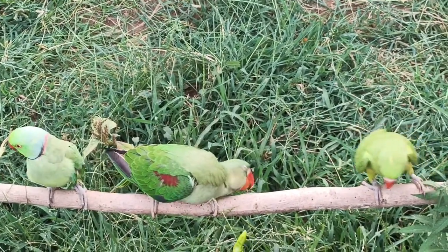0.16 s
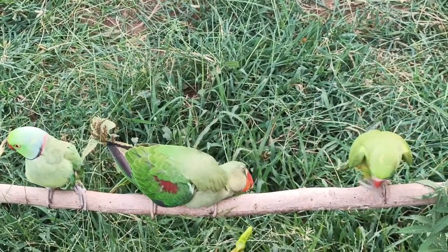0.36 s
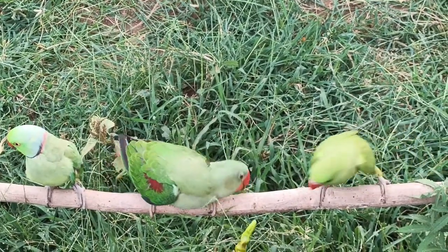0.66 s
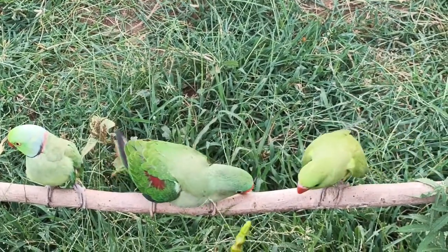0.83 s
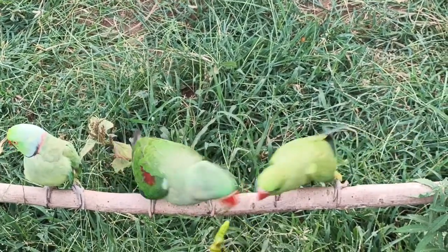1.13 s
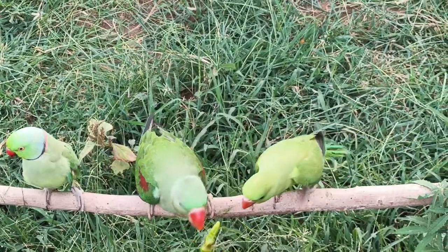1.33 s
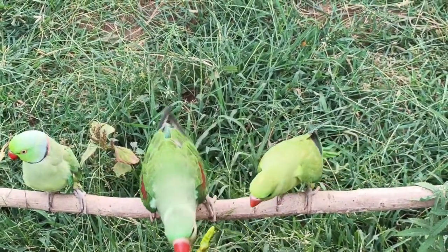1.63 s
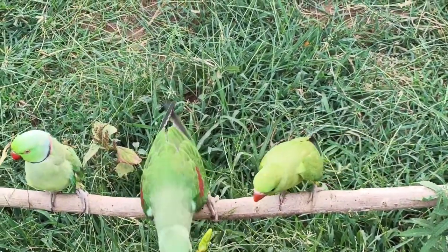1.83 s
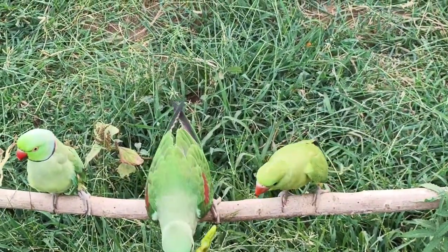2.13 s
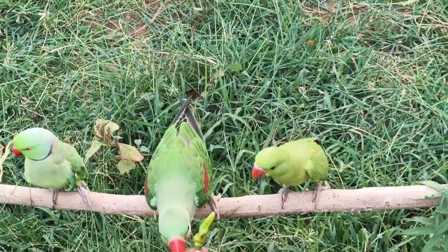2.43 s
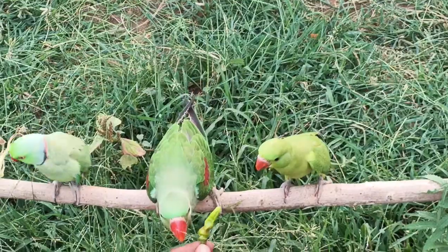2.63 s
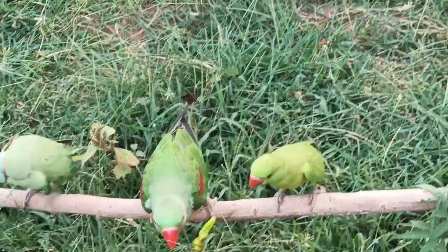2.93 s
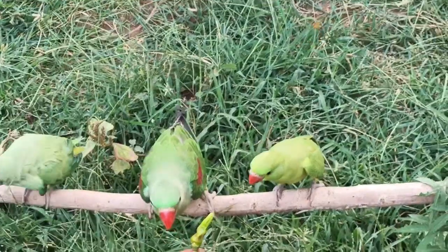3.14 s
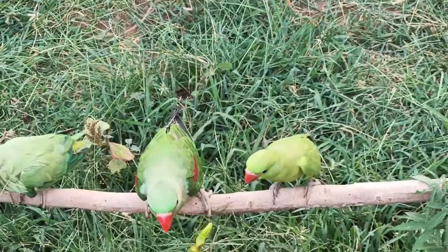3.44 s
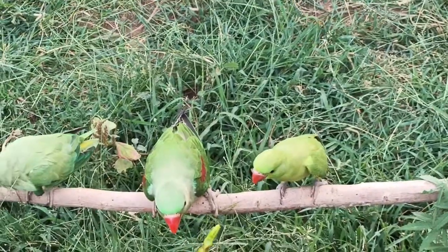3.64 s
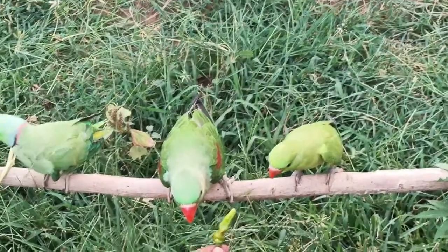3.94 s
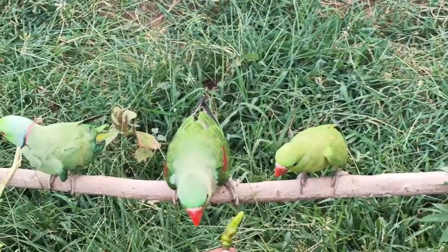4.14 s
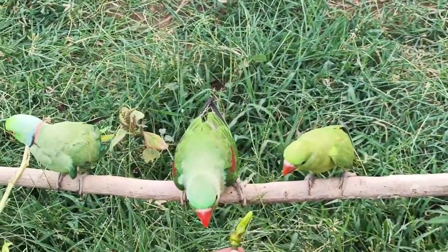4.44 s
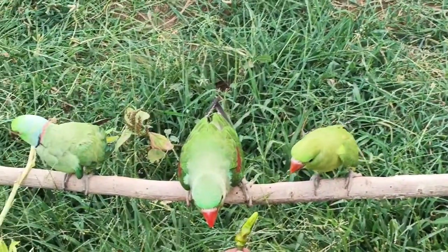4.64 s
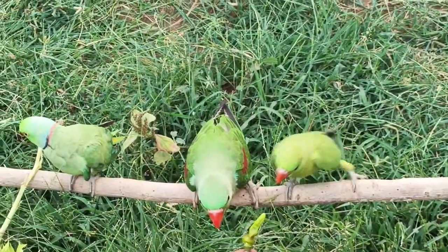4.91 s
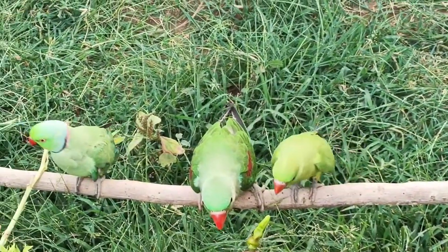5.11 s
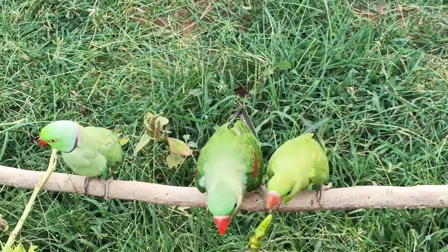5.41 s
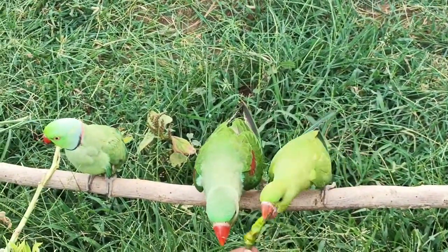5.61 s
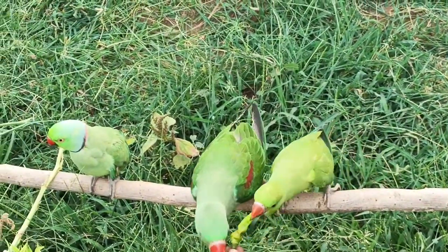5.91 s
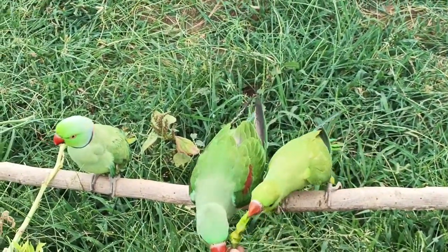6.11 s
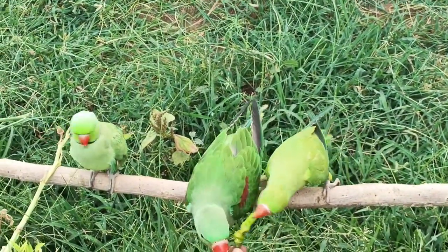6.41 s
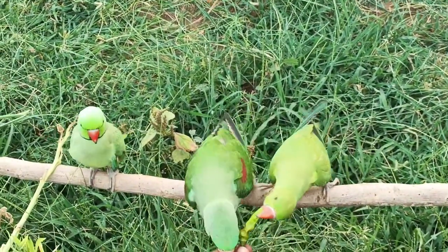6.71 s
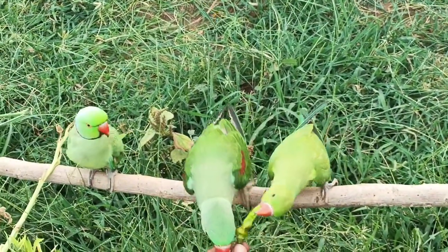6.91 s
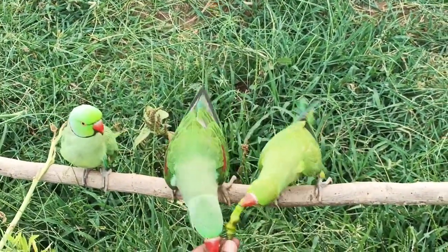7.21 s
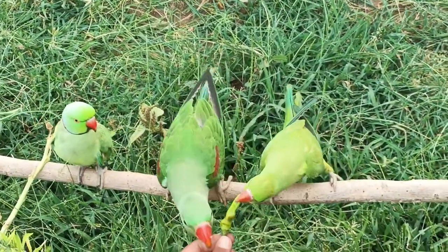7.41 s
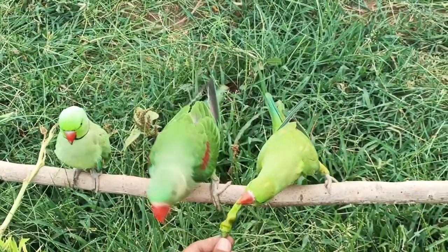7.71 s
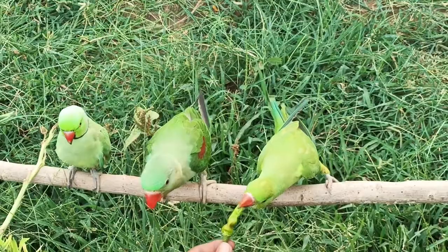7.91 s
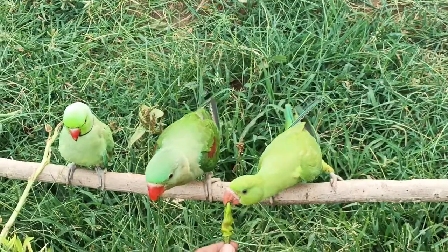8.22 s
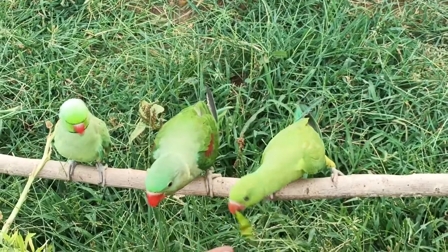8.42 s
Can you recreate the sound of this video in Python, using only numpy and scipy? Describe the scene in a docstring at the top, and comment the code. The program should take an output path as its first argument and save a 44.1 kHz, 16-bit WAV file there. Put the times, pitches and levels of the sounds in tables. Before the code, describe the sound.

Near parakeets on a branch screech in two separate pairs, each cry cracking rapidly between two registers before settling into a raspy, falling end. A short swish precedes the first pair; tiny cracks, hollow ticks and a soft knock follow the second. Crickets shimmer steadily and very high, with distant whistles and a faint low rumble in an open meadow with little echo.

```python
"""Screeching parakeets over grass

Four shrill screeches, stacks of tones whose trembling throat yodels between two registers.
Shaped noise gives a short swish, beak cracks and faint thumps; damped rings give two hollow ticks
and a dull knock. Behind: crickets in rough paired strokes at 7-8 kHz, far birds in gliding notes,
a noise floor and a low outdoor rumble that comes and goes."""
import sys
import numpy as np
from scipy import signal
from scipy.fft import rfft, irfft, next_fast_len
from scipy.io import wavfile
from scipy.ndimage import uniform_filter1d, map_coordinates

SR = 44100
rng = np.random.default_rng(int(sys.argv[2]) if len(sys.argv) > 2 else 0)


def store_wav(level_fs):
    """Save 16-bit WAV to argv[1]."""
    pcm = np.round(np.clip(np.atleast_2d(level_fs), -1, 1) * 32767)
    wavfile.write(sys.argv[1], SR, pcm.T.astype(np.int16))


N = 377055
T = np.arange(N) / SR

# spectrum of the whole meadow of crickets: (frequency [Hz], relative density [dB/Hz])
CHORUS_SPECTRUM = [(3240, -67), (5500, -48.5), (6060, -25), (7300, -5.5), (8220, -9.5), (9260, -11.5),
                   (9550, -24), (11000, -37.5), (13600, -38.5), (15000, -28), (15800, -34.5)]


def amp(db):
    """Decibels to amplitude."""
    return 10 ** (np.asarray(db) / 20)


def unit(x):
    """Scale to rms 1."""
    return x / np.sqrt(np.mean(np.abs(x) ** 2) + 1e-20)


def along(points, hz):
    """Interpolate (Hz, value) points on a log frequency axis."""
    f, v = np.transpose(points)
    return np.interp(np.log(hz + 1), np.log(f + 1), v)


def curves(rows, t=T):
    """One value per sample for each column after the time."""
    s, *cols = np.transpose(rows)
    return [np.interp(t, s, c) for c in cols]


def wobble(rate, size=N):
    """A smooth random curve, rate knots a second."""
    knots = rng.standard_normal(int(size * rate / SR) + 4)
    return map_coordinates(knots, [np.arange(size) * rate / SR])


def filtered(x, response):
    """x times a complex response of frequency."""
    m = next_fast_len(N + SR)
    return irfft(rfft(x, m) * response(np.fft.rfftfreq(m, 1 / SR)), m)[..., :N]


def noise(spectrum):
    """Coloured noise of rms 1."""
    return unit(filtered(rng.standard_normal(N), lambda hz: amp(along(spectrum, hz))))


def smear(rough, spread_hz, size=N):
    """Complex gain that turns a share of a tone into narrow noise."""
    rough = np.clip(rough, 0, 1)
    random_gain = wobble(spread_hz, size=size) + 1j * wobble(spread_hz, size=size)
    return np.sqrt(1 - rough) + np.sqrt(rough / 2) * random_gain


def rough_tone(hz, rough, spread_hz):
    """A tone of rms 1 on the pitch curve, part of it smeared."""
    carrier = np.exp(2j * np.pi * np.cumsum(hz) / SR)
    return unit(np.real(smear(rough, spread_hz, size=len(hz)) * carrier))


def notes(rows):
    """Short gliding notes; the rougher ones arch upward and smear wider."""
    out = np.zeros(N)
    for s, length_s, first_hz, last_hz, db, rough in rows:
        u = np.linspace(0, 1, round(length_s * SR))
        glide_hz = first_hz + (last_hz - first_hz) * u
        hz = glide_hz * (1 + 0.053 * rough * (np.sin(np.pi * u) - .6))
        swell = np.abs(np.sin(np.pi * u ** .7))
        note = swell * rough_tone(hz, rough, 40 + 500 * rough ** 2)
        out[round(s * SR):][:len(u)] += amp(db + 1.0) * note
    return out


def flip(t, jump_hz, tension, crest_s, period_s, slowing):
    """Share 0-1 of the flipped register: upward jumps ride the tremble's crests, downward ones its troughs."""
    sharpness = 1.9  # how abruptly the register follows the tremble
    since_s = t - crest_s
    # solves since_s = period_s * beats + slowing * beats ** 2
    beats = 2 * since_s / (period_s + np.sqrt(np.abs(period_s ** 2 + 4 * slowing * since_s)))
    tremble = np.tanh(jump_hz / 10) * np.cos(2 * np.pi * beats)
    return (1 + np.tanh(sharpness * (tension + tremble))) / 2


def screeches():
    """A stack of 12 tones; each flip moves the pitch and the tones' strength together."""
    # per screech: (time [s], relaxed pitch [Hz], register jump [Hz], tension [-1 relaxed, +1 flipped],
    #               tone 1 [dB], tone 2 [dB], tone 3 [dB], higher tones [dB]), levels before flip loss
    contours = [
        [(.798, 1335, 30, 2.5, -34.5, -38, -32, -52), (.812, 1418, 300, 0.9, -28, -34, -42, -45),
         (.83, 1455, 380, 5.5, -22.5, -25, -33, -42), (.884, 1532, 370, 2.5, -20, -23, -30.5, -29),
         (.897, 1493, 291.5, 0.12, -24.5, -32.5, -43, -39),
         (.965, 1453, 219.5, -0.95, -24, -35.5, -31.5, -36.5),
         (.99, 1450, 26.5, -0.8, -22.5, -29.5, -27.5, -36.5), (1.05, 1411, -1, -.5, -29, -23, -29, -38),
         (1.11, 1324, -80.5, -1.5, -35.5, -30, -33.5, -49), (1.142, 1240, -69.5, 0, -43, -40.5, -34.5, -43.5)],
        [(1.304, 1400, 10, 1.5, -41, -27.5, -33, -47), (1.324, 1360, 20, 1.5, -30.5, -27.5, -21, -27.5),
         (1.345, 1420, 289, 1.7, -31.5, -24, -27, -20), (1.4, 1477, 175, 1.1, -34.5, -20, -35, -20.5),
         (1.43, 1474, 199.5, .1, -29.5, -26.5, -21.5, -23.5), (1.5, 1407, 110.5, -0.62, -32.5, -25, -21, -23.5),
         (1.57, 1375, 11, -.5, -33.5, -22.5, -21.5, -24.5), (1.615, 1353, -0.5, -0.69, -35, -22, -28.5, -31.5),
         (1.64, 1180, 2, -0.69, -42.5, -37, -31, -49.5)],
        [(6.074, 1332, 302, -1.5, -41, -37, -38.5, -68), (6.085, 1419, 370, 0.15, -27.5, -42, -69, -47),
         (6.12, 1481, 371, 1, -19.5, -28, -45.5, -30.5), (6.15, 1486, 335.5, 0.47, -23, -36.5, -40.5, -41),
         (6.215, 1443, 291.5, -.55, -22.5, -36, -32.5, -49), (6.235, 1429, 70, -.4, -22.5, -34.5, -32.5, -48.5),
         (6.3, 1406, 52, -0.49, -27, -29, -29, -53.5), (6.38, 1368, 38.5, -0.13, -28, -23.5, -25, -49),
         (6.42, 1400, -110, -.6, -29, -23, -25.5, -48.5),
         (6.478, 1300, -120, -0.42, -38.5, -28.5, -33.5, -53.5)],
        [(6.652, 1285, 200, -1.8, -45, -57, -55, -71), (6.662, 1230, 230, .2, -35.5, -33, -31, -42),
         (6.69, 1470, 390, -.1, -22.5, -42, -28.5, -45.5), (6.76, 1502, 200.5, 0.26, -26, -45.5, -34.5, -45.5),
         (6.8, 1456, 216, -0.035, -23, -39, -32, -50.5), (6.82, 1446, 80.5, -0.24, -22.5, -39.5, -25, -51.5),
         (6.9, 1395, 7, -.5, -27.5, -33.5, -38.5, -50), (7.003, 1362, -115, -.55, -31, -35, -33, -51),
         (7.027, 1120, -14, -0.44, -52, -43, -68, -82)],
    ]
    # colour of the higher tones, one list per screech: (frequency [Hz], relative level [dB])
    beak_colours = [
        [(2940, -51), (5000, -16), (5860, -8), (6580, -18), (9210, -46), (10000, -24.5), (15800, -43.5)],
        [(2940, -49), (5000, -20), (6710, -5.5), (7860, -39), (8530, -22), (10500, -35), (11800, -26.5),
         (15800, -45.5)],
        [(2940, -35), (5000, 0.5), (6450, -23.5), (8740, -7), (9200, 4.5), (9650, -20), (10100, -3),
         (11100, -5), (11900, -18), (15800, -17)],
        [(2940, -25.5), (5000, -5), (8290, -26.5), (8870, -33), (9600, -5), (10250, -16), (11000, -5),
         (11900, -20), (15800, -30.5)],
    ]
    # tremble per screech: (time of a crest [s], period there [s], slowing [s/beat^2])
    trembles = [(.905, 0.027, .0004), (1.3554, 0.03, 0.00038), (6.0918, .0223, .00033),
                (6.677, .023, .0003)]
    # cost of a flip per screech: (tone 1 [dB per 100 Hz of jump], overtones [dB],
    #                              extra from tone 3 up [dB per 100 Hz of jump])
    flip_losses = [(4, 10.5, 0.5), (0.5, 6, 0.74), (3.5, 6.5, 3), (4, 6, 4)]
    # at the end the pitch sags by a share and the overtones linger
    sag, release_s, linger_db, linger_t60_s = .12, .002, -15, 0.078
    attack_s = 0.0027
    out, orders = np.zeros(N), np.arange(1, 13)[:, None]
    for rows, beak, tremble, losses in zip(contours, beak_colours, trembles, flip_losses):
        low_loss_db, over_loss_db, thin_db = losses
        start_s, end_s = rows[0][0], rows[-1][0]
        part = slice(round(start_s * SR), round((end_s + .04) * SR))
        t = T[part]
        size = len(t)
        hz, jump_hz, tension, *levels = curves(rows, t)

        flipped = flip(t, jump_hz, tension, *tremble)
        jump = jump_hz * flipped
        low_gain = amp(-low_loss_db * np.abs(jump) / 100)
        over_gain = amp(-over_loss_db * flipped)
        thin = amp(-thin_db * np.abs(jump) / 100)
        strain = np.clip(uniform_filter1d(jump, size=900) / 250, 0, 1)  # the high register is hoarse
        hz = hz + jump + (4 + 32 * strain) * wobble(230, size=size)

        after_s = np.clip(t - end_s, 0, None)
        voiced = np.exp(-after_s / release_s)
        hz = hz * (1 - sag * (1 - voiced))
        linger = voiced + (1 - voiced) * amp(linger_db - 60 * after_s / linger_t60_s)

        breath = np.real(smear(.02 * strain, 800, size=size))  # fills in noise between the overtones
        # higher tones are rougher and their smear is wider
        rasp = [smear((.003 + .018 * strain) * k ** 2, 60 + 90 * k, size=size) for k in orders[:, 0]]
        phase = orders * 2 * np.pi * np.cumsum(hz) / SR + 0.1 * orders ** 2
        tones = np.sqrt(2) * np.real(-np.exp(1j * phase) * rasp)

        drift = amp(4.7 * np.array([wobble(22.77, size=size) for _ in orders[3:]]))
        dull_db = -1.2 * (1 - strain) * (orders[3:] - orders[3])  # the relaxed register loses its top
        colour = amp(along(beak, orders[3:] * hz) + dull_db)
        high = unit(np.sum(colour * drift * tones[3:], axis=0))

        overtones = np.sum(amp(levels[1:]) * [tones[1], thin * tones[2], thin * high], axis=0)
        low = voiced * amp(levels[0]) * low_gain * tones[0]
        stack = low + linger * over_gain * breath * overtones
        out[part] = np.clip((t - t[0]) / attack_s, 0, 1) * stack
    return out


def swish():
    """Something sweeps past: ragged hiss over a darker rush, with a low knock inside."""
    # (time [s], hiss level [dB], body level [dB])
    envelope = [(.064, -75.5, -48), (.068, -30, -51), (.08, -29.5, -36.5), (.098, -31.5, -33),
                (.11, -29.5, -34), (.14, -39.5, -55.5), (.165, -65.5, -60.5), (.23, -96, -76)]
    # hiss spectrum: (frequency [Hz], relative density [dB/Hz])
    hiss_spectrum = [(1470, -43), (2500, -19), (3200, -15.5), (4060, -4), (6360, -8.5), (10100, 1.5),
                     (15800, -15.5)]
    # spectrum of the darker rush: (frequency [Hz], relative density [dB/Hz])
    body_spectrum = [(300, -16), (800, -5), (1600, -1.5), (2200, -0.5), (2900, -24), (4500, -33)]
    # low knock: (time [s], length [s], first pitch [Hz], last pitch [Hz], relative level [dB], roughness [0-1])
    knock_notes = [(.098, 0.023, 940, 880, -36, 0.47), (0.102, 0.033, 510, 340, -35.5, 0.52)]
    opens_s, dark_hz = 0.054, 1300  # the rush reaches below dark_hz only gradually
    start_s, end_s = envelope[0][0], envelope[-1][0]
    hiss_db, body_db = curves(envelope)
    on = (T > start_s) & (T < end_s)
    body = noise(body_spectrum)
    dark = filtered(body, lambda hz: 1 / (1 + (hz / dark_hz) ** 4))
    body = body - np.clip(1 - (T - start_s) / opens_s, 0, 1) * dark
    hiss = amp(hiss_db + 1.3 * wobble(270)) * noise(hiss_spectrum)
    return on * (hiss + amp(body_db) * body) + notes(knock_notes)


def cracks():
    """Each beak crack is a few ms of dying noise in the shell's resonances plus a bright snap."""
    # (time [s], relative level [dB], snap relative to that [dB])
    hits = [(7.3765, -51.5, -3), (7.3999, -48.5, 7), (7.9851, -37.5, -53), (8.0164, -47, -27),
            (8.22, -39.5, -6), (8.293, -30.5, -12.5), (8.3366, -46.5, -10), (8.3646, -27, -18.5)]
    # resonances of what the beak cracks: (centre [Hz], width [Hz], relative level per pass [dB])
    resonances = [(3600, 970, 1.5), (4870, 2700, 0)]
    low, high, t = np.zeros(N + SR), np.zeros(N + SR), T[:2000]
    for s, db, snap_db in hits:
        decay = amp(-60 * t / 0.022) + amp(-19.0 - 60 * t / .05)
        burst = rng.standard_normal(len(t)) * decay
        low[round(s * SR):][:len(t)] += amp(db + 1.5) * burst
        high[round(s * SR):][:len(t)] += amp(db + snap_db + 17.0) * burst

    def shell(f):
        """Band-pass resonances in parallel, alternating in sign."""
        total = 0
        for k, (centre, width, db) in enumerate(resonances):
            total = total + (-1) ** k * amp(db) * 1j * f * width / (centre * centre - f * f + 1j * f * width)
        return total

    def snap(f):
        """Steep high-pass with a soft top."""
        return (1j * f / (7000 + 1j * f)) ** 6 / (1 + 1j * f / 12000) ** 2

    return filtered(low[:N], lambda f: shell(f) ** 2) + filtered(high[:N], snap)


def ticks():
    """A small hollow body rings briefly in three damped modes."""
    # (time [s], relative level [dB])
    hits = [(7.5543, -22), (7.6243, -24)]
    # modes: (frequency [Hz], relative level [dB], t60 [s])
    modes = [(2213, 3.5, 0.022), (2250, -10, 0.056), (4420, -40, 0.035)]
    out, t = np.zeros(N), T[:4000]
    onset = 1 - np.exp(-(t / 0.0026) ** 2)
    ring = sum(amp(level - 60 * t / t60) * np.sin(2 * np.pi * hz * t) for hz, level, t60 in modes)
    for s, db in hits:
        out[round(s * SR):][:len(t)] += amp(db + 2.5) * onset * ring
    return out


def thud():
    """A dull knock on the branch and its bounce: each a low damped ring with a short broad tap."""
    # (time [s], ring level at onset [dB])
    contacts = [(8.4265, -48), (8.449, -56)]
    ring_hz, ring_t60_s, tap_t60_s = 520, .04, .015
    rush, out = noise([(300, -10.5), (2000, -4), (4500, -19), (7000, -50)]), np.zeros(N)
    for s, db in contacts:
        t = np.clip(T - s, 0, None)
        ring = amp(-60 * t / ring_t60_s) * np.sin(2 * np.pi * ring_hz * t)
        tap = amp(-10 - 60 * t / tap_t60_s) * rush
        out += (T > s) * amp(db) * (ring + tap)
    return out


def bumps():
    """Faint thumps: soft low puffs of noise."""
    # (time [s], level before the envelope [dB])
    puffs = np.array([(6.375, -56.5), (6.905, -56), (6.975, -56)])
    rise_s = 0.017
    u = np.clip(T - puffs[:, :1], 0, None) / rise_s
    envelope = np.sum(amp(puffs[:, 1:]) * u * np.exp(-u), axis=0)
    return envelope * noise([(60, -15.5), (220, 1), (1500, -40)])


def far_birds():
    """Distant peeps and whistles as gliding notes."""
    # (time [s], length [s], first pitch [Hz], last pitch [Hz], relative level [dB],
    #  roughness [0 pure, 1 fully smeared; above 1 only wider and more arched])
    calls = [(.13, 0.1, 3120, 3150, -63.5, 0.08), (0.231, 0.11, 2930, 2400, -64, 1),
             (.26, 0.34, 1389, 1271, -67, 0.45), (.445, 0.034, 3410, 3300, -61, 0.86),
             (0.456, 0.051, 2205, 2066, -58.5, 0.4), (.515, 0.042, 2824, 2678, -51.5, 0.97),
             (0.7, 0.11, 4600, 4400, -63, 1.1), (.71, .085, 2220, 2130, -66, .35),
             (.72, 0.095, 4100, 4250, -57.5, 0.7), (0.734, 0.029, 3400, 3290, -59, 0.4),
             (1.819, 0.21, 3175, 3090, -70, 0.35), (2.177, 0.17, 2903, 2945, -68, 0.2),
             (3.55, .07, 4700, 3200, -76.5, .8), (3.61, 0.078, 3190, 2745, -74, 0.62),
             (3.75, 0.054, 3480, 3500, -70.5, 0.66), (3.8, 0.4, 3700, 3530, -82.5, 0.2),
             (4.379, 0.077, 4580, 4360, -71.5, 0.97), (4.65, 0.054, 4620, 4670, -59, 1.28),
             (4.72, 0.061, 4520, 4260, -66, 1.1), (5.39, 0.079, 4260, 4230, -61, 0.78),
             (5.63, 0.27, 1133, 1330, -63.5, 0.14), (5.78, 0.17, 1336, 1215, -65, 0.08),
             (5.93, 0.027, 4360, 4350, -66.5, 0.6), (5.968, 0.041, 4400, 4620, -61, 0.47),
             (5.99, 0.072, 5030, 4880, -67, .5), (6.005, 0.079, 3405, 3270, -68, 0.42),
             (7.0, 0.11, 4440, 4271, -56.5, 1.48), (7.276, 0.063, 2260, 2235, -59.5, 0.34),
             (7.371, 0.041, 2070, 2086, -60.5, 0.45), (7.639, 0.072, 4530, 4500, -68, 0.6)]
    return notes(calls)


def cricket(beats, low_hz):
    """Two wing strokes a chirp, each a rough tone that steps down about 1 kHz, with a faint octave and rustle."""
    slot = 3 * ((beats + 0.24) % 1)  # two strokes, then a rest
    u = np.clip((slot % 1) / 1.1, 0, 1)
    stroke = (slot < 2) * np.abs(np.sin(np.pi * u ** 0.89))
    hz = low_hz + 480 * (1 - np.tanh((u - .45) / 0.11))
    tone = rough_tone(hz, .6, 400) + amp(-31) * rough_tone(2 * hz, .7, 700)
    rustle = amp(-9) * noise(CHORUS_SPECTRUM)
    return unit(stroke * (tone + rustle))


def crickets():
    """Two near singers drifting against each other, and the blurred meadow behind them."""
    # (time [s], lag of the first [chirp periods], its mean level [dB], lag of the second [chirp periods])
    singers = [(0, .15, -59, 0.72), (.7, 0.23, -57.5, 0.46), (1.3, .2, -59.5, 0.64), (2, .2, -60.5, 0.13),
               (3.1, 0.11, -59.5, 0.46), (3.9, .26, -60, 0.14), (4.6, .27, -61, -0.055),
               (5.4, 0.24, -63.5, 0.036), (6, 0.26, -69.5, 0.071), (6.8, 0.13, -61, -.1),
               (7.5, 0.14, -65.5, -0.66), (8.55, 0.026, -64, -0.66)]
    chirp_hz = 19.16
    lag, level_db, other_lag = curves(singers)
    first = amp(level_db + wobble(20)) * cricket(chirp_hz * T - lag, low_hz=7240)
    second = amp(-61.5 + wobble(33)) * cricket(chirp_hz * T - other_lag, low_hz=7380)
    return first + second + amp(-64.5) * noise(CHORUS_SPECTRUM)


def echoes(x, t60_s, thin_hz):
    """Scattered answers of trees and ground, blurred by moving leaves and thin in the bass."""
    t = T[:SR]
    tail = rng.standard_normal(len(t)) * amp(-60 * t / t60_s) * (t > .004)
    wet = signal.fftconvolve(x * wobble(220), tail / np.linalg.norm(tail))[:N]
    return filtered(wet, lambda hz: 1 / (1 + (hz / 6000) ** 4) * hz ** 2 / (hz ** 2 + thin_hz ** 2))


def outdoor_floor():
    """Nearly steady air noise, and a low rumble that comes and goes."""
    # air spectrum: (frequency [Hz], relative density [dB/Hz])
    air_spectrum = [(100, 0), (200, -0.5), (700, -3.5), (2000, -9.5), (5000, -15), (9000, -29.5),
                    (16000, -41)]
    # rumble spectrum: (frequency [Hz], relative density [dB/Hz])
    rumble_spectrum = [(25, -28.5), (50, -6), (81, 4.5), (204, -14.5), (390, -45), (660, -120)]
    # gusts: (time [s], rumble level before its flutter [dB])
    gusts = [(0, -78.5), (.95, -72), (1.95, -84.5), (2.15, -70), (2.9, -74.5), (3.15, -70.5), (4.4, -84.5),
             (5, -64), (5.3, -82.5), (7, -77.5), (7.3, -84), (8.55, -81.5)]
    air = amp(-73 + 0.47 * wobble(2.1)) * noise(air_spectrum)
    rumble = amp(curves(gusts)[0] + 5.9 * wobble(25)) * noise(rumble_spectrum)
    return air + rumble


def scene():
    """Near and far sources with their echoes, over crickets and the outdoor floor."""
    near = screeches() + swish() + cracks() + ticks() + thud()
    far = far_birds()
    ground = amp(-17) * echoes(near, .09, 1500)
    trees = amp(-22.5) * echoes(near, 0.55, 2200) + amp(-7.5) * echoes(far, 0.25, 300)
    return (near + bumps() + far + ground + trees + crickets() + outdoor_floor())[None]


def record(dry):
    """The microphone chain thins out the deep bass and keeps nothing above its band limit."""
    top_hz, bass_hz = 15760, 45
    return filtered(dry, lambda hz: (hz < top_hz) * hz ** 2 / (hz ** 2 + bass_hz ** 2))


dry = scene()
out = record(dry)
store_wav(out)
```